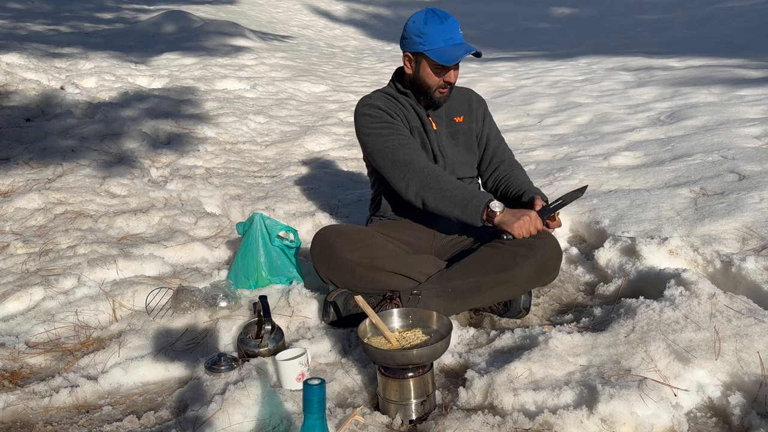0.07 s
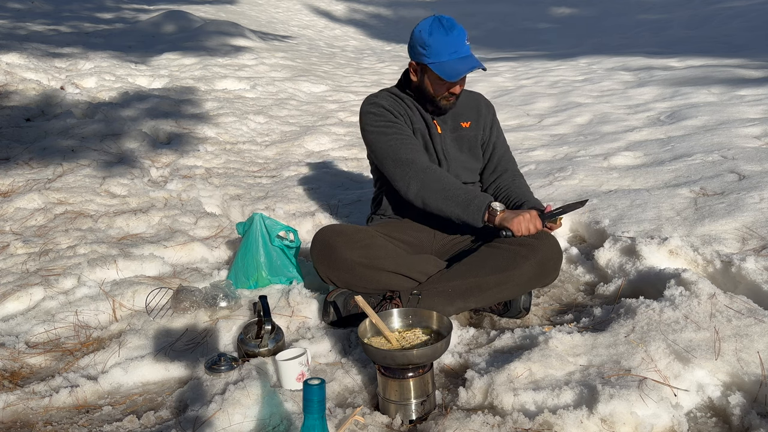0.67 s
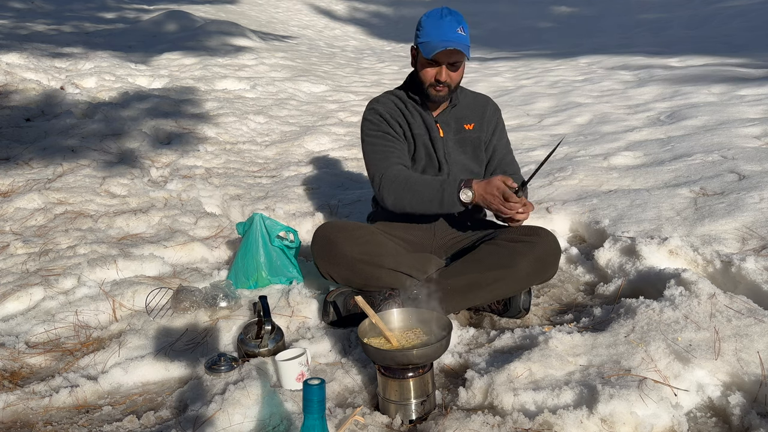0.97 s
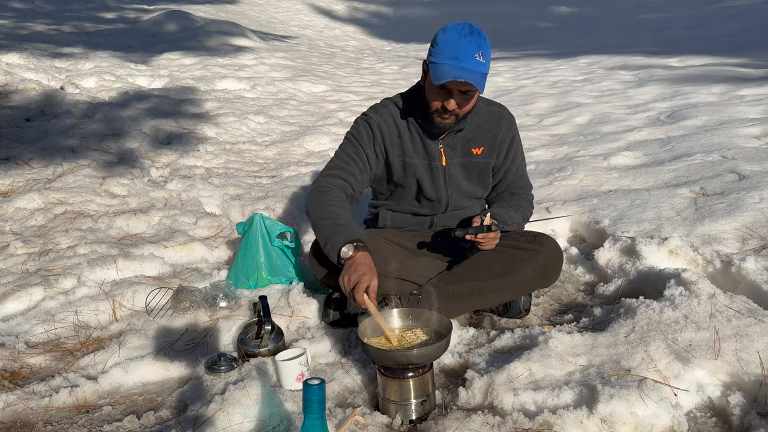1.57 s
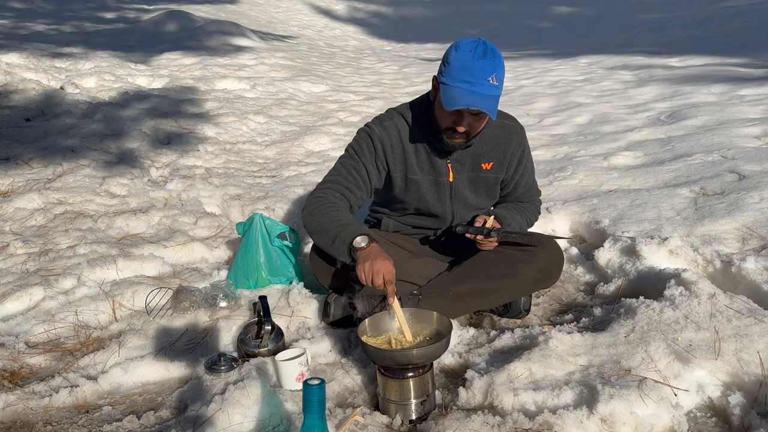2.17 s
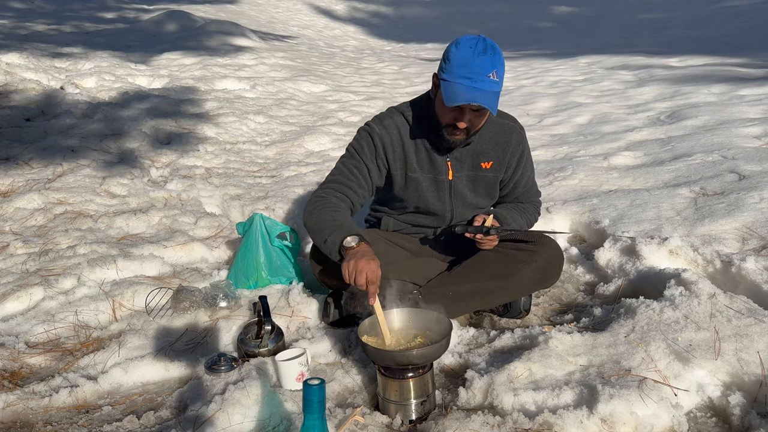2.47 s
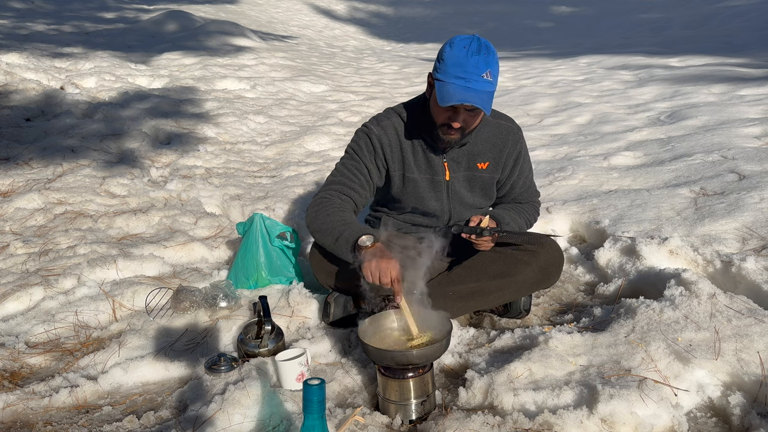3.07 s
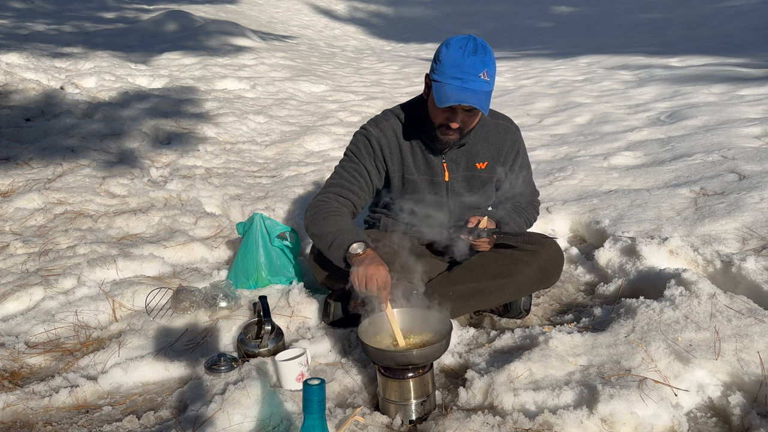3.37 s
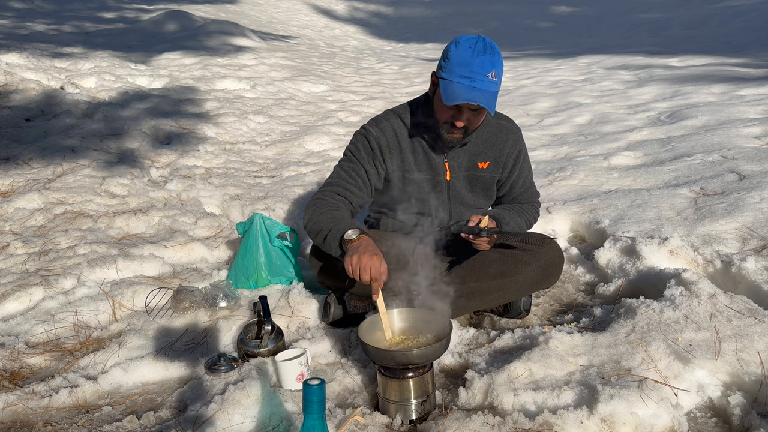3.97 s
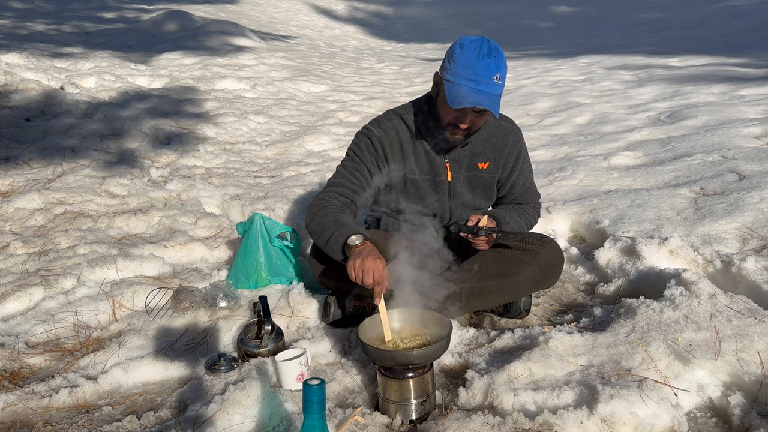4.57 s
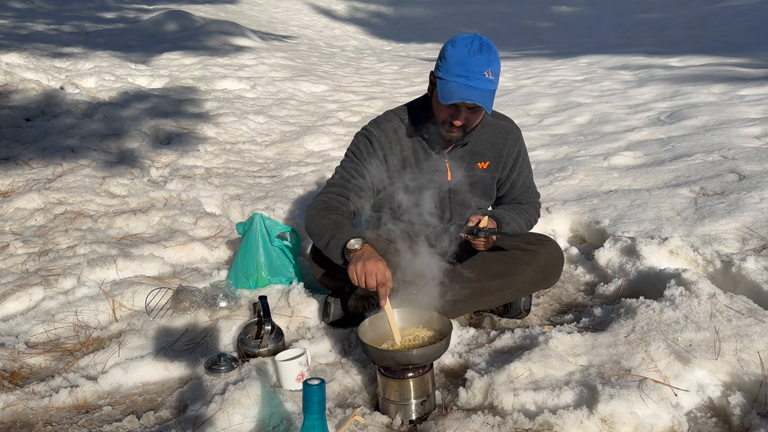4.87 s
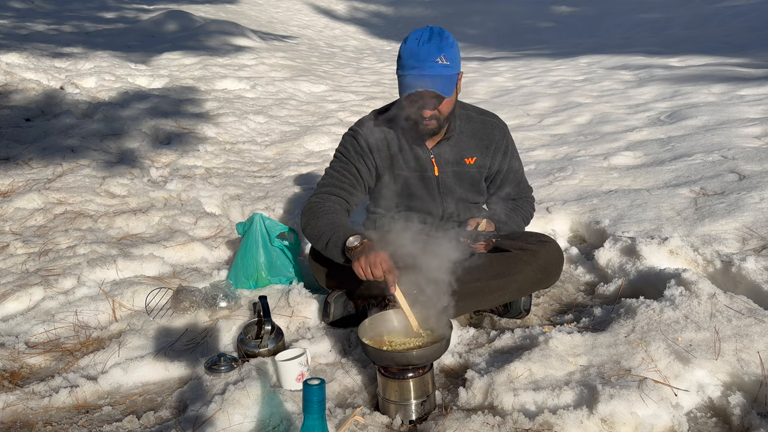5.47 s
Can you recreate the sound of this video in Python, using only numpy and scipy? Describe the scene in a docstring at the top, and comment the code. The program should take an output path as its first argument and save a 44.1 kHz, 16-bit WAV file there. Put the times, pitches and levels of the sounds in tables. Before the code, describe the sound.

The place is outdoors and very quiet, with faint air and a slight low rumble on the microphone. In the first half second a distant bird gives two faint, raspy calls. From about 0.7 to 1.6 seconds, close by, a knife nicks a twig with light, dry clicks and brief rustles, while food begins to fry very softly on a camp stove. At 2 seconds a wooden stick pushes through the food and the sizzle flares in a short, bright hiss. Around 2.5 seconds the stick scrapes and knocks on the metal pan with another flare. Fat spits in small ticks from 3 to 3.4 seconds. The strongest sizzle comes at about 3.5 seconds, followed by sharp stick taps and several shorter hisses until 4.5 seconds. One loud tick lands near 4.7 seconds, then a few soft knocks and rustles follow as the frying fades by 5.3 seconds.

```python
"""Camp stove in the snow

Out on quiet snow, a bird rasps in the distance. Nearer the microphone a knife nicks a twig while
food fries faintly on a camp stove. Then a wooden stick stirs the pan: every push brings wet food
onto hot metal and the sizzle flares. Fat spits, the stick ticks and judders on the pan, and light
air rumbles at the microphone's two ports."""
import sys
import numpy as np
from scipy import signal
from scipy.fft import rfft, irfft
from scipy.io import wavfile

SR = 44100
rng = np.random.default_rng(int(sys.argv[2]) if len(sys.argv) > 2 else 0)


def dump(signal):
    """Clip the signal to [-1, 1] and save it as 16-bit WAV at the path in sys.argv[1]."""
    limited = np.clip(np.atleast_2d(signal).T, -1, 1)
    pcm = np.round(limited * 32767).astype(np.int16)
    wavfile.write(sys.argv[1], SR, pcm)


N = 243413
TIME = np.arange(N) / SR
BINS = np.maximum(np.fft.rfftfreq(N, 1 / SR), 1)


def from_db(db):
    """Decibels to gain."""
    return 10 ** (np.asarray(db) / 20)


def unit_rms(x):
    """Scale to unit power."""
    return x / np.sqrt(np.mean(x ** 2) + 1e-20)


def over_bins(points):
    """Rows of Hz and value, joined on a log frequency axis."""
    hz, value = np.transpose(points)
    return np.interp(np.log(BINS), np.log(hz), value)


def colour(x, spectrum):
    """Give a signal a spectrum, at unit power."""
    return unit_rms(irfft(rfft(x) * from_db(over_bins(spectrum)), N))


def drift(hz):
    """A random wander of unit power, mostly slower than hz."""
    return unit_rms(irfft(rfft(rng.standard_normal(N)) / (1 + (BINS / hz) ** 2), N))


def rise(start, length):
    """A smooth step from 0 to 1."""
    return np.sin(np.pi / 2 * np.clip((TIME - start) / length, 0, 1)) ** 2


def swell(start, length):
    """One smooth rise and fall."""
    return np.sin(np.pi * np.clip((TIME - start) / length, 0, 1))


def widen(pair, likeness):
    """Two unrelated signals become left and right, with a likeness per frequency."""
    alike = np.clip(over_bins(likeness), -1, 1)
    mid, side = rfft(pair)
    return irfft(np.sqrt((1 + alike) / 2) * mid + np.sqrt((1 - alike) / 2) * side * [[1], [-1]], N)


def ring(force, modes):
    """Decaying modes, alternating in sign, driven by a force."""
    out = 0
    for k, (hz, db, t60) in enumerate(modes):
        radius, angle = from_db(-60 / (t60 * SR)), 2 * np.pi * hz / SR
        poles = [1, -2 * radius * np.cos(angle), radius ** 2]
        out = out + (-1) ** k * from_db(db) * signal.lfilter([.5, 0, -.5], poles, force + 1e-18)
    return out


def grains(per_s, spread_db):
    """Two streams of tiny bursts of uneven size; the power does not depend on the rate."""
    chance = np.clip(per_s / SR, 1e-4, 1)
    sizes = from_db(spread_db * np.minimum(rng.exponential(1, (2, N)), 4.5))
    fired = rng.random((2, N)) < chance
    return unit_rms(fired * sizes * rng.choice([-1, 1], (2, N)) / np.sqrt(chance))


def uneven_run(start, end, per_s, jitter, spread_db, size=64):
    """Times and level offsets of small events that follow each other unevenly."""
    chance = rng.standard_normal((size, 2))
    times = start + (np.arange(size) + jitter * chance[:, 0]) / per_s
    return [(s, db) for s, db in zip(times, spread_db * chance[:, 1]) if 0 < s < end]


# Still air over the snow, a low drone, and air on the microphone.
# Each row: frequency in Hz, relative spectral level in dB.
AIR_SPECTRUM = [(25, -31.5), (80, -12.5), (160, -3.5), (320, -4), (800, -9.5), (1500, -13), (3000, -19),
                (6000, -20.5), (10000, -25), (16000, -26.5)]
DRONE_SPECTRUM = [(40, -37.5), (85, -14), (140, 2), (200, 0), (300, -7), (600, -54), (1500, -49)]
RUMBLE_SPECTRUM = [(22, -18), (40, -10), (56, -1.5), (80, -7.5), (120, -11), (250, -36), (600, -91)]
# All three at the two ports. Each row: frequency in Hz, left-right likeness from 0 to 1.
OUTDOOR_LIKENESS = [(30, 0.17), (80, 0.56), (300, 0.3), (1500, 0.32), (5000, 0.12), (16000, 0.15)]


def outdoors():
    """Faint open air all around; near 0.8 s the soft drone sinks and the bass opens into a low rumble."""
    change = rise(start=.79, length=.063)
    drone_db = -73 - 13.5 * change
    rumble_db = -101 + 31 * change
    layers = (-71, AIR_SPECTRUM), (drone_db, DRONE_SPECTRUM), (rumble_db, RUMBLE_SPECTRUM)
    return sum(from_db(db) * widen(colour(rng.standard_normal((2, N)), spectrum), OUTDOOR_LIKENESS)
               for db, spectrum in layers)


# A bird, far off. Each row: start, length and attack in seconds, top pitch in Hz, relative level in dB.
DISTANT_CALLS = [(0.019, 0.14, 0.064, 3484, -68.5), (0.311, 0.13, 0.0054, 3345, -67)]
# Its echoes off the slope. Each row: delay in seconds, level against the call in dB.
SLOPE_ECHOES = [(.15, -13.5), (.24, -12), (.275, -13)]


def bird(rasp_hz=400, rasp_radians=.95, waver=.043, top_s=.046, bend_octaves=.1, release_s=.036):
    """A distant arched call with a fast, uneven rasp, blurred on its way and echoed by the slope."""
    rasp = rasp_radians * np.sin(2 * np.pi * np.cumsum(rasp_hz * (1 + .15 * drift(120))) / SR)
    unsteady = 1 + waver * drift(820)
    call = 0
    for s, length, attack, top_hz, db in DISTANT_CALLS:
        hz = top_hz * 2 ** (-bend_octaves * (np.clip(TIME - s, 0, length) / top_s - 1) ** 2)
        envelope = rise(s, attack) * (1 - rise(s + length - release_s, release_s))
        tone = unit_rms(np.sin(2 * np.pi * np.cumsum(hz * unsteady) / SR + rasp))
        call = call + from_db(db) * envelope * tone
    call = call + sum(from_db(db) * np.interp(TIME - delay, TIME, call, left=0)
                      for delay, db in SLOPE_ECHOES)
    age = TIME[:SR // 10]
    paths = rng.standard_normal((2, len(age))) * from_db(-60 * age / .013)   # 60 dB down in 13 ms
    blurred = signal.fftconvolve(call[None], paths / np.linalg.norm(paths[0]))[:, :N]
    return .75 * call + .49 * blurred


# Sleeve, shavings and food, near the microphone. Each row: start and length in seconds, level in dB.
BRIEF_RUSTLES = [(0.854, 0.042, -57.5), (1.008, 0.087, -58), (1.505, 0.068, -55.5), (1.86, 0.052, -56),
                 (5.115, 0.042, -57), (5.158, 0.056, -63.5)]
# The twig being handled. Each row: start and end in seconds, rustles per second, level in dB.
TWIG_HANDLING = [(.475, .575, 25, -68.5), (1.149, 1.49, 12.57, -64)]
# The colour of both. Each row: frequency in Hz, relative spectral level in dB.
RUSTLE_SPECTRUM = [(400, -7), (1000, -11), (3000, -3.5), (5000, -4), (8500, -1.5), (10300, 3),
                   (12200, -3.5), (14800, 5), (16000, -17)]
# Rustle and sizzle at the two ports. Each row: frequency in Hz, left-right likeness from 0 to 1.
FRONT_LIKENESS = [(300, 0.23), (1000, 0.87), (2100, 1), (3300, 0.34), (4400, 0.81), (5300, 0.067),
                  (6000, 0.76), (7000, 0.51), (8400, 0.68), (9300, 0.99), (11000, 1), (12000, 1),
                  (12800, 0.28), (14000, .99)]


def rustles(sounding_share=.6):
    """Short crisp sweeps of fine grains, and fainter ones in uneven runs as the twig is handled."""
    faint = [(s, sounding_share / per_s, run_db + db) for start, end, per_s, run_db in TWIG_HANDLING
             for s, db in uneven_run(start, end, per_s, jitter=.25, spread_db=1.5)]
    effort = sum(swell(s, length) * from_db(db) for s, length, db in BRIEF_RUSTLES + faint)
    return effort * widen(colour(grains(7000, spread_db=3.5), RUSTLE_SPECTRUM), FRONT_LIKENESS)


# Blade and wood in front of the microphone.
# Each row: time in seconds, wood pitch in Hz, body level in dB, snap level in dB before its boost.
WOOD_TICKS = [(0.7104, 1700, -40.5, -36), (0.7202, 4600, -34.5, -37), (0.769, 4500, -38, -43),
              (0.9328, 3350, -42, -38), (0.9427, 2440, -30, -34), (1.1935, 2280, -45, -39),
              (1.3038, 2100, -45.5, -38), (1.373, 2800, -55, -39), (1.511, 2000, -38.5, -37),
              (1.5459, 2100, -42, -37), (1.8005, 1300, -35, -43), (2.6122, 3300, -22, -52),
              (2.9774, 3230, -27, -30), (3.0663, 3370, -39.5, -30), (3.123, 3170, -30.5, -21.5),
              (3.639, 2830, -15.5, -32), (3.732, 2780, -30, -17), (3.8073, 2200, -26, -20),
              (3.961, 3130, -34.5, -27.5), (4.7485, 2550, -12.5, -21.5), (5.0763, 3200, -39.5, -32.5),
              (5.3458, 1470, -34, -43)]
# A tick's woody body. Each row: multiple of its pitch, relative level in dB, t60 in seconds.
BODY_MODES = [(.64, -0.5, 0.0016), (1, 1.5, 0.0025), (1.4, -4.5, 0.0023)]
# Its bright snap. Each row: frequency in Hz, relative level in dB, t60 in seconds.
SNAP_MODES = [(6040, -15, 0.002), (8240, -13.5, 0.0021), (9660, -9, 0.0024), (15900, -0.5, 0.0013)]


def ticks(events, snap_boost_db=3, scatter_db=-3.5, scatter_t60=.014):
    """Each sharp contact rings as a woody click and a bright snap, with a short scatter from the pan."""
    out, age = np.zeros((2, N)), TIME[:SR // 20]
    impulse = signal.unit_impulse(len(age))
    low_cut = signal.butter(2, 800, "high", fs=SR, output="sos")   # small things radiate no bass
    contact = signal.sosfilt(low_cut, impulse)
    for s, wood_hz, body_db, snap_db in events:
        body = ring(contact, [(ratio * wood_hz, db, t60) for ratio, db, t60 in BODY_MODES])
        snap = ring(contact, [(hz * (1 + .03 * rng.normal()), db + 2 * rng.normal(), t60)
                              for hz, db, t60 in SNAP_MODES])
        click = from_db(body_db) * body / np.linalg.norm(body)
        click += from_db(snap_db + snap_boost_db) * snap / np.linalg.norm(snap)
        scatter = rng.standard_normal((2, len(age))) * from_db(-60 * age / scatter_t60)
        paths = impulse + from_db(scatter_db) * scatter / np.linalg.norm(scatter[0])
        start = round(s * SR)
        out[:, start:start + len(age)] += signal.fftconvolve(paths, click[None])[:, :len(age)]
    return out


# Hands, stick and food at the stove. Each row: time in seconds, pitch in Hz, peak in dB, t60 in seconds.
DULL_KNOCKS = [(.710, 484, -53, 0.017), (0.7192, 433, -49, 0.015), (1.873, 430, -54, 0.018),
               (2.442, 586, -58.5, 0.061), (2.489, 554, -53, 0.087), (2.533, 860, -49, .025),
               (2.543, 1350, -38.5, 0.0094), (2.567, 945, -46, 0.074), (3.85, 1120, -51, 0.022),
               (5.084, 805, -49.5, 0.016), (5.139, 540, -55.5, 0.05)]


def knocks():
    """Soft contacts, each one damped tone."""
    out = np.zeros(N)
    for s, hz, db, t60 in DULL_KNOCKS:
        age = np.maximum(TIME - s, 0)
        out += np.sin(2 * np.pi * hz * age) * from_db(db - 60 * np.minimum(age / t60, 3))
    return out


# Food left to itself on the stove. Each row: time in seconds, relative level in dB.
SIMMER_LEVELS = [(.8, -88), (.9, -73.5), (1.8, -69.5), (3.2, -76), (5.1, -79.5), (5.3, -96.5)]
# The stick pushing through the food. Each row: start, rise and hold in seconds,
# decay in dB per second, relative levels of fine fizz and coarse sputter in dB.
STICK_PUSHES = [(1.905, 0.087, .05, 150, -54.5, -57.5), (2.033, 0.045, 0.024, 128.5, -35.5, -43),
                (2.192, 0.038, 0.094, 40.5, -53.5, -59.5), (2.463, 0.14, 0.043, 210, -44, -48.5),
                (2.738, .11, .025, 155, -51, -59), (2.973, 0.035, 0.11, 204, -65, -74.5),
                (3.24, 0.044, 0.015, 21, -61, -73), (3.439, 0.074, 0.025, 154.5, -40.5, -47.5),
                (3.518, 0.038, 0.029, 109.5, -30, -37), (3.746, 0.028, 0.011, 242.5, -39.5, -47),
                (3.996, 0.041, 0.016, 314, -41.5, -53), (4.183, 0.085, 0.032, 161, -34.5, -42),
                (4.368, .07, 0.047, 202, -40.5, -44), (4.588, 0.049, 0.14, 178, -65, -70)]


def sizzle_levels(simmer_sputter_db=-2, linger_s=.021):
    """Gains of fizz and sputter: the flares of all pushes add in power to the simmer."""
    times, simmer_db = np.transpose(SIMMER_LEVELS)
    fizz_power = from_db(np.interp(TIME, times, simmer_db, left=-140, right=-140)) ** 2
    sputter_power = fizz_power * from_db(simmer_sputter_db) ** 2
    for s, attack, hold, db_per_s, fizz_db, sputter_db in STICK_PUSHES:
        fizz_power += (from_db(fizz_db) * flare(s, attack, hold, db_per_s)) ** 2
        sputter_power += (from_db(sputter_db) * flare(s, attack, hold + linger_s, db_per_s)) ** 2
    return np.sqrt(fizz_power), np.sqrt(sputter_power)


# The sizzle as it reaches the microphone. Each row: frequency in Hz, relative spectral level in dB.
SIZZLE_SPECTRUM = [(300, -28), (550, -27), (900, -12), (1600, -7), (4000, -5), (4700, -7), (6000, -2),
                   (6900, -7.5), (8000, -2), (9100, -4.5), (10300, 3.5), (12200, -4), (14300, 1.5),
                   (15700, -7)]


def frying(split_hz=4500, fizz_db=1.5, sputter_db=-.51, crackle_db=-8.5, flutter_db=1):
    """Steam pockets burst on the hot metal: crackles at rest, a dense hiss when the food is pushed."""
    fizz, sputter = sizzle_levels()
    push = np.sqrt(fizz / fizz.max())
    hiss = grains(1500 + 26000 * push, spread_db=2.5)
    crackle = from_db(crackle_db) * grains(200 + 4000 * push, spread_db=3)
    bursts = colour(food_hollows(hiss + crackle), SIZZLE_SPECTRUM)
    spectrum = rfft(widen(bursts, FRONT_LIKENESS))
    low_pass = 1 / (1 + (BINS / split_hz) ** 8)
    coarse = from_db(sputter_db) * sputter * unit_rms(irfft(spectrum * low_pass, N))
    fine = from_db(fizz_db) * fizz * unit_rms(irfft(spectrum * (1 - low_pass), N))
    return (fine + coarse) * from_db(flutter_db * drift(40))


def food_hollows(pair, depth_db=2.2, width_hz=130, hold_s=.018, size=256):
    """Broad resonances come and go, as the hollows in stirred food change shape."""
    frames = dict(nperseg=size, noverlap=size * 3 // 4)
    spectra = signal.stft(pair, **frames)[2]
    ripple = rng.standard_normal(spectra.shape[1:])
    # smooth over frequency, then over time
    for axis, extent in enumerate((width_hz * size / SR, hold_s * SR * 4 / size)):
        window = np.exp(-.5 * (np.arange(-30, 31) / extent) ** 2)
        ripple = signal.fftconvolve(ripple, np.expand_dims(window, 1 - axis), mode="same")
    return signal.istft(spectra * from_db(depth_db * unit_rms(ripple)), **frames)[1][:, :N]


# The stick dragged over the pan. Each row: start and length in seconds, level in dB.
STICK_DRAGS = [(1.766, 0.062, -68), (1.837, 0.084, -64), (2.464, 0.028, -61), (2.493, 0.082, -52),
               (2.572, 0.089, -58)]
# The metal pan on the stove. Each row: frequency in Hz, relative level in dB, t60 in seconds.
PAN_MODES = [(473, -7.5, 0.011), (665, -1.5, 0.0082), (833, 2.5, 0.02), (910, 2, 0.013),
             (1206, -3.5, 0.017), (1500, -6, 0.012)]


def stick_drag():
    """The stick judders over the pan, whose modes are damped by the food."""
    effort = sum(swell(s, length) * from_db(db) for s, length, db in STICK_DRAGS)
    judder = grains(500, spread_db=-1)[0]
    return effort * unit_rms(ring(judder, PAN_MODES))


def flare(start, attack, hold, db_per_s):
    """Wet food meets hot metal: the sizzle rises, holds and dies as the water boils off."""
    return rise(start, attack) * from_db(-db_per_s * np.maximum(TIME - start - attack - hold, 0))


# Fat spitting in the pan between the strong pushes. Each row: start and end in seconds, spits per second.
SPIT_RUNS = [(2.955, 3.184, 14), (3.261, 3.44, 30.2), (3.9, 3.95, 35)]


def fat_spits(hz=2930, body_db=-44, snap_db=-34):
    """Drops of fat burst at uneven times, as rows of small, bright ticks."""
    return [(s, hz, body_db + db, snap_db + db) for start, end, per_s in SPIT_RUNS
            for s, db in uneven_run(start, end, per_s, jitter=.52, spread_db=2.5)]


def bump(start=3.14, length=.075, db=-48.5, hz=57):
    """One soft low thump of a few cycles."""
    return from_db(db) * swell(start, length) ** 2 * np.sin(2 * np.pi * hz * (TIME - start))


# Sound from the front at the microphone's ports. Each row: frequency in Hz, lead of the left in radians.
FRONT_PHASE = [(20, 0), (2400, 0), (3300, 1.3), (4350, 0), (4950, 1.1), (6200, 0), (7250, 2.0), (8200, 0),
               (8900, 0), (9350, -1.8), (10000, -1.3), (10700, -np.pi), (12050, -np.pi), (12700, -1.8),
               (13500, 0)]


def scene():
    """The stove in front reaches the two ports with a phase difference; bird and air lie around it."""
    front = frying() + ticks(WOOD_TICKS + fat_spits()) + knocks() + stick_drag() + rustles() + bump()
    port_shift = np.exp(.5j * over_bins(FRONT_PHASE) * [[1], [-1]])
    return irfft(rfft(front) * port_shift, N) + bird() + outdoors()


def record(dry):
    """The treble is cut steeply above 15.9 kHz."""
    return signal.sosfilt(signal.ellip(10, .1, 70, 15900, fs=SR, output="sos"), dry)


dry = scene()
out = record(dry)
dump(out)
```